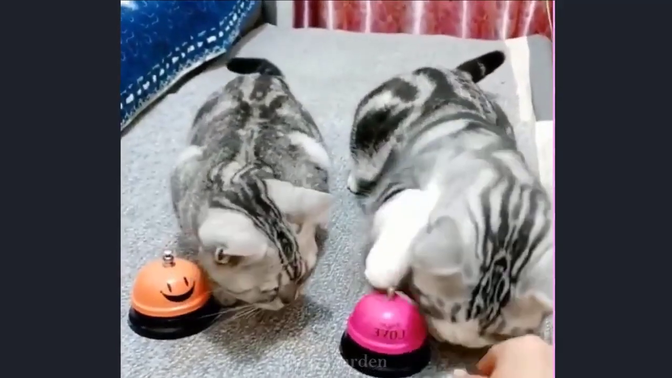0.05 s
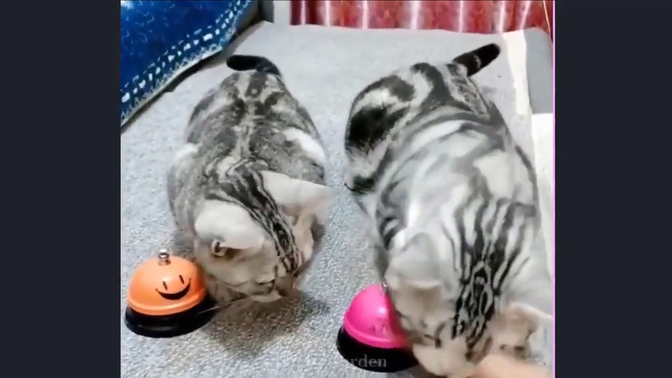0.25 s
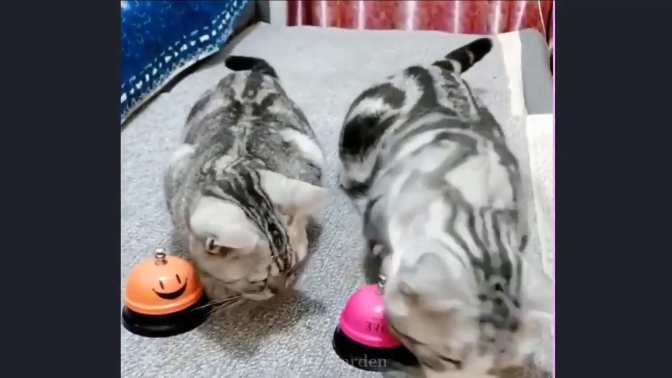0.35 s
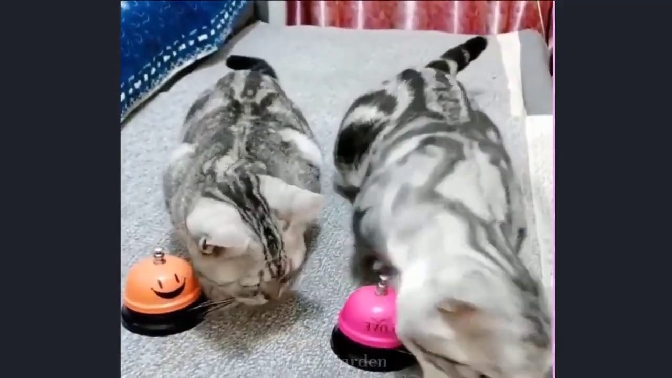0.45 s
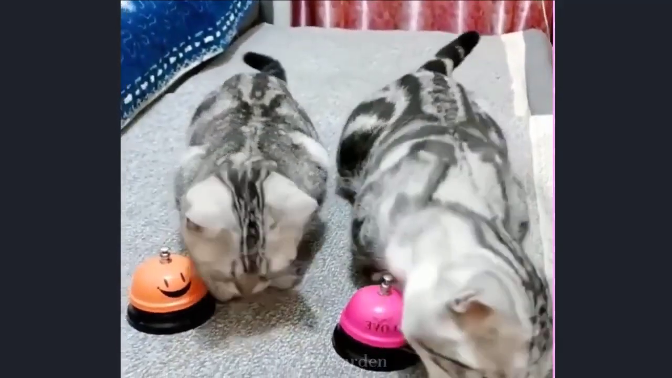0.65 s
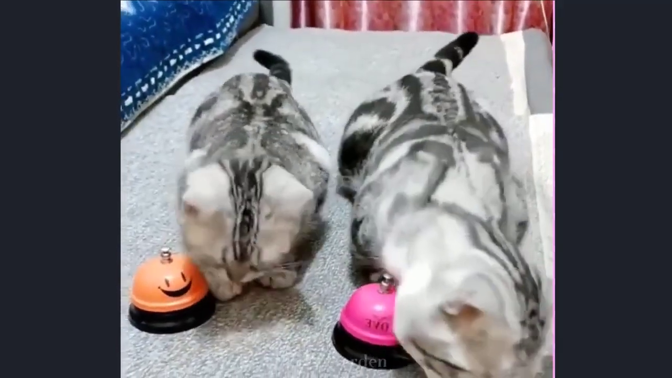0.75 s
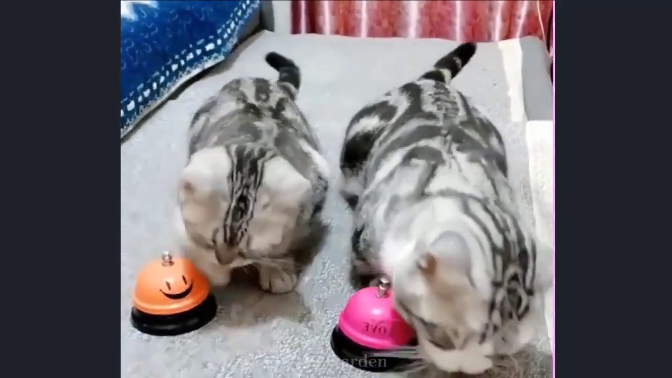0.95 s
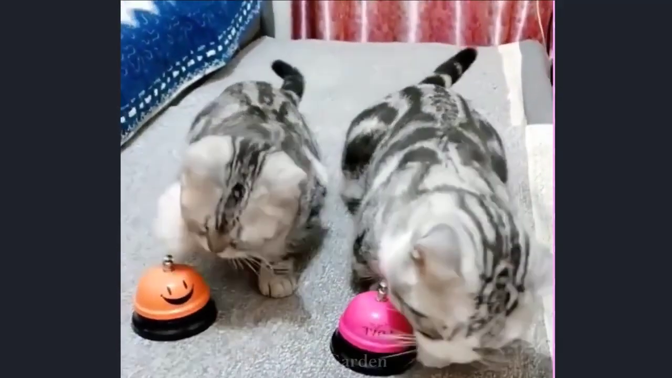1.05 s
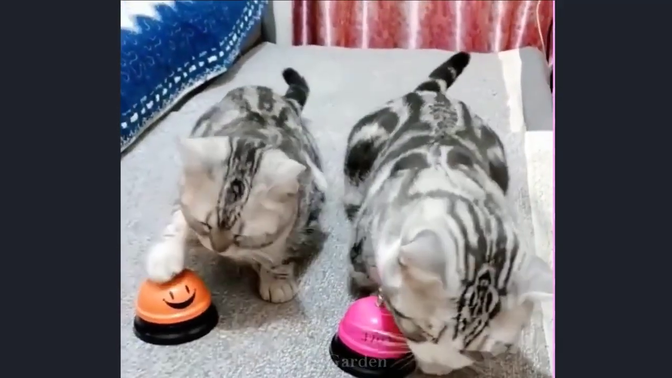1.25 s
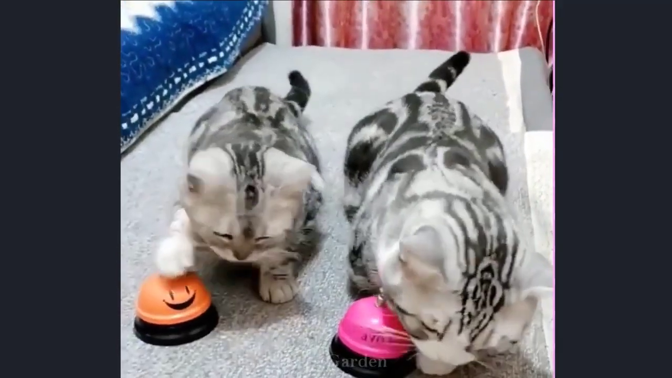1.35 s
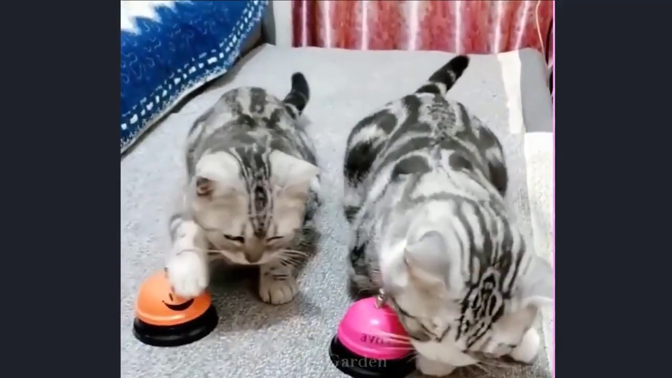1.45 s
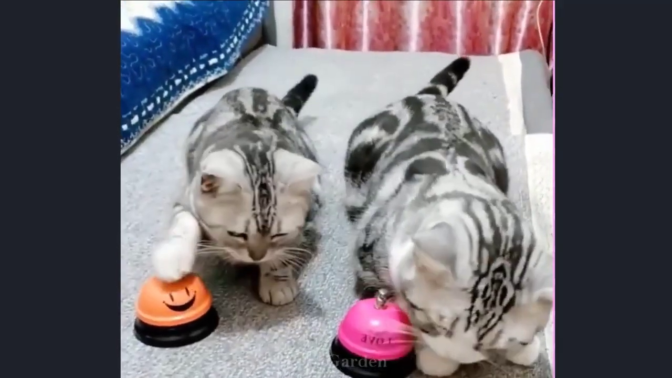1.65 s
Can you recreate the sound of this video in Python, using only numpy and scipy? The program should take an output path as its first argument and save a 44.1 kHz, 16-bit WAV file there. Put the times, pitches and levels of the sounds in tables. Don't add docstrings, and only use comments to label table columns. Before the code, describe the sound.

A service bell dings sharply, then a second one, both muffled by paws over faint hiss

```python
import sys
import numpy as np
from scipy import signal
from scipy.fft import rfft, irfft
from scipy.io import wavfile
from scipy.ndimage import uniform_filter1d

SR = 44100
rng = np.random.default_rng(int(sys.argv[2]) if len(sys.argv) > 2 else 0)


def gain_from_db(level_db):
    decades = np.asarray(level_db, float) / 20
    return 10 ** decades


def transcribe(u):
    v = np.clip(np.atleast_2d(u).T, -1, 1)
    q = np.round(v * 32767).astype(np.int16)
    wavfile.write(sys.argv[1], SR, q)


N = 77175
T = np.arange(N) / SR

# (frequency [Hz], density [dB per Hz])
ROOM_SPECTRUM = [(25, 2.5), (100, -6.5), (300, -14.5), (1000, -22.5), (3500, -30), (8000, -30.5),
                 (11000, -28.5), (15500, -45)]
ROOM_DB, CUTOFF_HZ = -59.5, 16100
# (time [s], bright hiss [dB], low rumble [dB])
ROOM_SWELLS = [(0, 1.5, 1), (0.198, 5, 2.5), (0.398, -4, 0.5), (.65, -3, -4), (0.918, 4.5, 0),
               (1.1, 0.5, -0.5), (1.349, 1.5, 1), (1.55, -4.5, 1), (1.75, -4, 0.5)]
# (frequency [Hz], likeness [0-1])
EAR_LIKENESS = [(60, 0.87), (240, 1), (700, 0.2), (3000, 0.27), (15000, 0.087)]
# (time [s], level [dB])
HUM_LEVELS = [(0, -64.5), (.19, -66.5), (.33, -54), (.7, -56.5), (.85, -66), (1.15, -56.5), (1.42, -57),
              (1.52, -49.5), (1.75, -51)]
HUM_HZ, HUM_WOBBLE_DB, HUM_PAN_DB = 57.2, 1.4, 1
DUCK_DB, DUCK_S = -6, .009

ONE_HZ = [1134.5, 1164.0, 3063.6, 3071.4, 5656.2, 5679.4, 6481, 7925, 8097, 8715, 8785.6, 12372, 12575.4,
          13278]
TWO_HZ = [1193.6, 3218.2, 3223.9, 5958.4, 6858, 8786, 8970, 9474.6, 9474.6, 11540, 12575.5]
# (left [dB], right [dB], t60 [s], swell [s])
BELL_ONE = [(-47.5, -39.5, 1.34, 0.15), (-58, -70.5, 13, 0.11), (-41, -54, 7.1, 0.27),
            (-35.5, -43, 6.7, 0.086), (-26.5, -40.5, 0.9, 0.19), (-29.5, -34, 0.96, 0.15),
            (-48, -42, 0.32, 0.017), (-45, -39, 0.38, 0.0034), (-34.5, -28, 0.34, .01),
            (-25, -38, 0.54, 0.18), (-8, -9, 0.37, 0.075), (-41, -55.5, 0.12, .004),
            (-21.5, -71, 0.33, 0.0019), (-55.5, -57.5, .12, 0.0029)]
BELL_TWO = [(-59, -53.5, 4.8, 0.082), (-39.5, -57.5, 8, 0.018), (-72.5, -70.5, 2.5, .02),
            (-44, -33, 0.82, 0.017), (-65, -53, 0.06, 0.00406), (-22, -41.5, 0.25, 0.0036),
            (-25, -33, 0.18, 0.0034), (-14, -15, 0.26, 0.069), (-36.5, -59, .7, 0.0035),
            (-64, -57, 0.12, 0.0045), (-26.5, -41.5, 0.26, 0.0034)]
# (left [dB], right [dB], t60 [s], swell [s])
LEFTOVER = [(-71, -58.5, 4.0, .01), (-62, -69.5, 5.9, .01), (-52, -70, 4, .01), (-50.5, -61, 3.2, .01),
            (-53, -69, 2.2, .01), (-54.5, -70.5, 0.79, .01)]
ONE_SIDE = [1, 1, 1, 1, -1, 1, 1, 1, 1, 1, 1, 1, 1, 1]
TWO_SIDE = [1, 1, -1, -1, 1, -1, 1, 1, 1, 1, 1]
# (strike [s], touch [s], takes off [dB], within [s], then drag [dB per s])
RING_LEFTOVER = (-.011, .187, 12, .012, 30)
RING_ONE = (.2416, 0.5627, 16.3, 0.051, 36.6)
RING_TWO = (1.399, 1.676, 9.5, 0.12, 30)
FREE_LEFTOVER = (-.0135, .225, 6, .015, 30)

# (time [s], length [s], level [dB], centre [Hz], left-right [dB])
RUSTLES = [(0.103, 0.014, -68.5, 7100, 26), (0.161, 0.0087, -56, 8800, 7), (0.18, 0.029, -46, 7300, 10),
           (0.469, 0.049, -60, 9500, 5), (0.931, 0.071, -100, 9000, 5.5), (0.947, 0.033, -64, 2000, 0.5),
           (0.231, 0.05, -63, 500, -4), (1.283, 0.019, -60.5, 940, 3), (1.302, 0.024, -67, 9000, 5),
           (1.338, 0.013, -60.5, 8800, 8.5), (1.353, 0.02, -56, 10500, 4.5),
           (1.379, 0.026, -57.5, 9000, 16), (1.414, 0.036, -60.5, 2320, 5), (0.062, 0.16, -62.5, 5990, 6),
           (1.619, 0.043, -60.5, 6700, 6)]
RUSTLE_OCTAVES, RUSTLE_GRAINS_PER_S = 0.5, 16000
# (centre [Hz], width [Hz], level [dB])
BASE = [(940, 400, -6.5), (2940, 260, 0), (4325, 347, 6.5), (4630, 210, -2), (5375, 208, -3),
        (6475, 680, -9), (6970, 190, -4.5), (8420, 950, 7), (9120, 490, -3.5), (10150, 230, -9),
        (11950, 320, -9), (13300, 2200, -6), (14320, 660, -6)]
BASE_VALLEY_DB, BASE_RAGGED_DB = -17, 6

# (time [s], level [dB], left-right [dB], kind [0 dull pad, 1 plunger])
TAPS = [(.106, -64, 11, 1), (.1885, -66, 2, 1), (.2445, -50, 2.5, 1), (1.259, -66, 2.5, 0),
        (1.2885, -53.5, 6.5, 0), (1.293, -54.5, 13.5, 0), (1.3593, -50.5, 11, 1), (1.3655, -51.5, 10, 1),
        (1.3952, -47, 10, 1), (1.4005, -52.5, -2, 0), (1.634, -63.5, 8.5, 1)]
# (frequency [Hz], level [dB], t60 [s])
PAD = [(531.4, -7, .04), (992, 0, 0.033), (1638, -6.5, .045), (2466, -11, 0.044), (4280, -11, 0.034),
       (4760, -18, .04), (6340, -20, .03)]
PLUNGER = [(2778, -9.5, 0.058), (5340, -4.5, 0.045), (6896, -8.5, 0.03),
           (4330, -13, .03), (8670, -13, .05), (9910, -13, .05), (10170, -8.5, 0.055),
               (13320, -9.5, 0.0304)]

# (frequency [Hz], level [dB])
CHATTER_ONE = [(600, -36), (1500, -22.5), (3000, -39.5), (5500, -21), (8500, -2.5), (10500, -2.5),
               (13000, -10.5), (16000, -21)]
CHATTER_TWO = [(600, -18), (1500, -11.5), (3500, -41.5), (5500, -8.5), (8500, 2), (10500, 7), (13000, -5),
               (16000, -20.5)]
CHATTER_ONE_DB, CHATTER_TWO_DB, CHATTER_PER_S = -26, -32.5, 9000
LEAD_S, LEAD_DB = 0.0037, -18.5
RATTLE_THINS_HZ, RATTLE_THINS_DB = 7500, 7
# (frequency [Hz], level [dB])
TAIL = [(1000, 3), (2500, 19), (4500, 11.5), (8500, -2.5), (10500, -3.5), (13000, -1)]
TAIL_DB, TAIL_T60_S = -4.5, 0.34
# (strike [s], drop [s], takes off [dB], within [s], then drag [dB per s])
RATTLE_ONE = (.2405, .2578, 9, .003, 300)
RATTLE_TWO = (1.399, 1.418, 22, .003, 540)
BRIGHT_ONE_HZ = [7925, 8097, 9300, 12372, 13278]
BRIGHT_TWO_HZ = [8340, 8780, 9470, 10190, 10800, 12300, 12600, 13000, 13520]
# (left [dB], right [dB], t60 [s], swell [s])
BRIGHT_ONE = [(-37, -30, .5, 0.0036), (-27.5, -23.5, 0.57, 0.0048), (-39, -38.5, 0.45, .004),
              (-34.5, -49.5, .5, 0.0045), (-32.5, -46, .5, .004)]
BRIGHT_TWO = [(-36, -26, 0.57, 0.0027), (-42, -28, 0.82, 0.0036), (-34, -32.5, .5, 0.0028),
              (-40, -25.5, .5, 0.0026), (-50, -51, .5, .004), (-31, -47, .5, 0.0033),
              (-21.5, -44, 0.43, .004), (-29, -41, .5, .004), (-38, -28.5, 0.44, 0.0037)]

# (time [s], level [dB], left-right [dB])
CLICKS = [
    (.2447, -19.5, 1.5),
    (1.4145, -26.5, 4),
    (1.4016, -28, -7),
]
CLICK_LOW_HZ, CLICK_T60_S = 4630, .004
# (time [s], pitch [Hz], level [dB])
MEW = [
    (.7, 1118, -82),
    (.74, 1115, -66),
    (.78, 1120, -69),
    (.82, 1136, -62),
    (.9, 1131, -80),
]

MASK_DB, MASK_UP, MASK_DOWN = -32.5, 1.3, 1.157
QUIET_DB, QUIET_MID_DB, QUIET_HZ = -101.5, -111, 11000


def rms_one(x):
    return x / np.sqrt(np.mean(x ** 2) + 1e-20)


def at_hz(points, hz):
    table = np.array(points)
    return np.interp(np.log(hz), np.log(table[:, 0]), table[:, 1])


def panned(level_db, pan_db):
    return level_db + pan_db * np.array([[.5], [-.5]])


def drift(rate):
    r = np.exp(-80 * np.pi * rate / SR)
    noise = rng.standard_normal(N // 40 + 2002)
    slow = signal.lfilter([1], [1, -2 * r, r * r], noise)[2000:]
    return np.interp(np.arange(N) / 40, np.arange(len(slow)), rms_one(slow))


def colour(x, gain_of_hz):
    hz = np.maximum(np.arange(N // 2 + 1) * SR / N, 10)
    return rms_one(irfft(rfft(x) * gain_of_hz(hz), N))


def grains(per_s, uneven_db):
    hit = rng.random((2, N)) < per_s / SR
    sign = rng.choice([-1, 1], (2, N))
    return hit * sign * gain_from_db(uneven_db * np.minimum(rng.exponential(1, (2, N)), 4))


def room(patchy_db):
    out, together = 0, drift(2)
    edges = np.append(20 * 2 ** np.arange(0, 9.9, .5), CUTOFF_HZ)
    s, bright, low_end = np.transpose(ROOM_SWELLS)
    air_db, rumble_db = np.interp(T, s, bright), np.interp(T, s, low_end)
    white = rng.standard_normal((2, 2, N))
    for k, (low, high) in enumerate(zip(edges, edges[1:])):
        band = signal.butter(2, [low, high], "band", fs=SR, output="sos")
        mid, side = signal.sosfilt(band, white[k % 2])
        hz = np.sqrt(low * high)
        alike = np.clip(at_hz(EAR_LIKENESS, hz), -1, 1)
        flicker_db = patchy_db * np.clip(np.log2(hz / 100) / 6, .3, 1) * (.3 * together + drift(4.5))
        swell_db = air_db * np.clip(np.log2(hz / 1500) / 2, 0, 1)
        swell_db = swell_db + rumble_db * np.clip(np.log2(900 / hz), 0, 1)
        gain = gain_from_db(at_hz(ROOM_SPECTRUM, hz) + flicker_db + swell_db)
        out = out + gain * (np.sqrt(1 + alike) * mid + np.sqrt(1 - alike) * side * [[1], [-1]])
    return gain_from_db(ROOM_DB) * rms_one(out)


def hum():
    level_db = np.interp(T, *np.transpose(HUM_LEVELS)) + 3 + HUM_WOBBLE_DB * drift(6.5)
    tone = np.sin(2 * np.pi * np.cumsum(HUM_HZ + 2.0 * drift(8)) / SR)
    return gain_from_db(panned(level_db, HUM_PAN_DB)) * tone


def bell(pitches, modes, ring, sides=None):
    strike, touch, loss_db, within, drag_db = ring
    t, out = np.maximum(T - strike, 0), 0
    paw_db = -loss_db * np.clip((T - touch) / within, 0, 1) - drag_db * np.maximum(T - touch - within, 0)
    for hz, side, (left_db, right_db, t60, swell) in zip(pitches, sides or [1] * len(modes), modes):
        swelling = np.sin(np.pi / 2 * np.minimum(t / swell, 1)) ** 2
        rise = np.minimum(t / 0.0024, 1) * (0.25 + 0.75 * swelling)
        tone = rise * gain_from_db(paw_db - 60 * t / t60) * np.sin(2 * np.pi * hz * t)
        out = out + np.array([[1], [side]]) * gain_from_db([[left_db], [right_db]]) * tone
    return out


def leftover_ring():
    padded = bell(ONE_HZ[2:4], LEFTOVER[2:4], RING_LEFTOVER)
    free = bell(ONE_HZ[:2] + ONE_HZ[4:6], LEFTOVER[:2] + LEFTOVER[4:], FREE_LEFTOVER)
    return padded + free


def base(hz):
    humps = sum(gain_from_db(level_db) / (1 + (2 * (hz - centre_hz) / width) ** 2)
                for centre_hz, width, level_db in BASE)
    ragged_db = BASE_RAGGED_DB * np.sin(hz / 31 + 3 * np.sin(hz / 173))
    return (humps + gain_from_db(BASE_VALLEY_DB)) * gain_from_db(ragged_db)


def rustles():
    out, fur = 0, grains(RUSTLE_GRAINS_PER_S, 2.5)
    for s, length, level_db, centre_hz, pan_db in RUSTLES:
        u = np.maximum(T - s, 0) / length
        shape = np.minimum(u / .3, 1) * np.exp(-np.maximum(u - .7, 0) * 2.2)
        octaves = RUSTLE_OCTAVES * np.sqrt(centre_hz / 8000)
        brush = colour(fur, lambda hz: base(hz) * (
            0.026 + np.exp(-.5 * (np.log2(hz / centre_hz) / octaves) ** 2)))
        out = out + gain_from_db(panned(level_db, pan_db)) * shape * brush
    return out


def taps():
    out, uneven = 0, rng.standard_normal((len(TAPS), 8))
    for (s, level_db, pan_db, kind), spread in zip(TAPS, uneven):
        t = np.maximum(T - s, 0)
        modes = PLUNGER if kind > .5 else PAD
        ring = sum(gain_from_db(mode_db + 2.05 * u - 60 * t / t60) * np.sin(2 * np.pi * hz * t)
                   for (hz, mode_db, t60), u in zip(modes, spread))
        out = out + gain_from_db(panned(level_db, pan_db)) * np.minimum(t / 0.00063, 1) * ring
    return out


def chatter(timing, spectrum, level_db):
    t, knocks = T - timing[0], grains(CHATTER_PER_S, 3.2)
    rattle = np.clip(t / 0.0017, 0, 1) * np.clip(1 - (T - timing[1]) / 0.0024, 0, 1)
    scrape = gain_from_db(LEAD_DB) * (t <= .002) * np.clip(1 + t / LEAD_S, 0, 1)
    tail = gain_from_db(TAIL_DB - 60 * np.maximum(t, 0) / TAIL_T60_S) * np.clip(t / 0.0022, 0, 1)

    def near_gain(hz):
        thin_db = RATTLE_THINS_DB * np.minimum(np.log2(hz / RATTLE_THINS_HZ), 0)
        return gain_from_db(at_hz(spectrum, hz) + thin_db) * base(hz)

    def far_gain(hz):
        thin_db = 14 * np.minimum(np.log2(hz / 600), 0)
        return gain_from_db(at_hz(spectrum, hz) + at_hz(TAIL, hz) + thin_db) * base(hz)

    near, far = colour(knocks, near_gain), colour(knocks, far_gain)
    return gain_from_db(level_db) * (near * (rattle + scrape) + far * tail)


def clicks():
    high = signal.butter(2, CLICK_LOW_HZ, "high", fs=SR, output="sos")
    crack, out = signal.sosfilt(high, rng.standard_normal((2, N))), 0
    for s, level_db, pan_db in CLICKS:
        decay_db = -60 * np.maximum(T - s, 0) / CLICK_T60_S
        out = out + gain_from_db(panned(level_db, pan_db) + decay_db) * (T > s) * crack
    return out


def mew():
    s, hz, level_db = np.transpose(MEW)
    on = (T > s[0]) & (T < s[-1])
    tone = np.sin(2 * np.pi * np.cumsum(np.interp(T, s, hz)) / SR)
    return on * gain_from_db(np.interp(T, s, level_db)) * tone


def scene():
    duck = sum(np.exp(-((T - ring[0] + DUCK_S) / DUCK_S) ** 2) for ring in (RING_ONE, RING_TWO))
    bed = gain_from_db(DUCK_DB * duck) * (room(patchy_db=3.0) + hum() + rustles())
    bells = leftover_ring() + bell(ONE_HZ, BELL_ONE, RING_ONE, ONE_SIDE)
    bells = bells + bell(TWO_HZ, BELL_TWO, RING_TWO, TWO_SIDE)
    bright_tones = bell(BRIGHT_ONE_HZ, BRIGHT_ONE, RATTLE_ONE) + bell(BRIGHT_TWO_HZ, BRIGHT_TWO, RATTLE_TWO)
    rattles = chatter(RATTLE_ONE, CHATTER_ONE, CHATTER_ONE_DB)
    rattles = rattles + chatter(RATTLE_TWO, CHATTER_TWO, CHATTER_TWO_DB)
    return bed + bells + taps() + bright_tones + rattles + clicks() + mew()


def thin_out(x):
    hz, _, z = signal.stft(x, SR, nperseg=2048, noverlap=1024, window="cosine")
    power = uniform_filter1d(np.mean(abs(z) ** 2, axis=0), size=4, axis=0)
    level_db = 10 * np.log10(power + 1e-20)
    near_db = np.array([level_db[int(k / MASK_UP):int(k * MASK_DOWN) + 1].max(axis=0)
                        for k in range(len(hz))])
    floor_db = np.where(hz[:, None] < QUIET_HZ, QUIET_MID_DB, QUIET_DB)
    bar_db = np.maximum(near_db + MASK_DB, floor_db)
    keep = np.clip((level_db - bar_db) / 2.9 + .5, 0, 1)
    return signal.istft(z * keep, SR, nperseg=2048, noverlap=1024, window="cosine")[1][:, :N]


def low_pass(x):
    return signal.sosfilt(signal.butter(12, 16120, fs=SR, output="sos"), x)


def record(dry):
    top_cut = signal.cheby2(12, 70, CUTOFF_HZ, fs=SR, output="sos")
    mix = signal.sosfilt(top_cut, thin_out(dry))
    return low_pass(mix)


dry = scene()
out = record(dry)
transcribe(out)
```